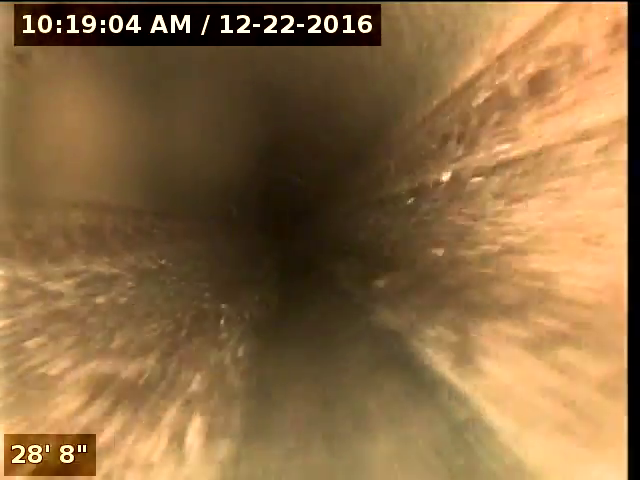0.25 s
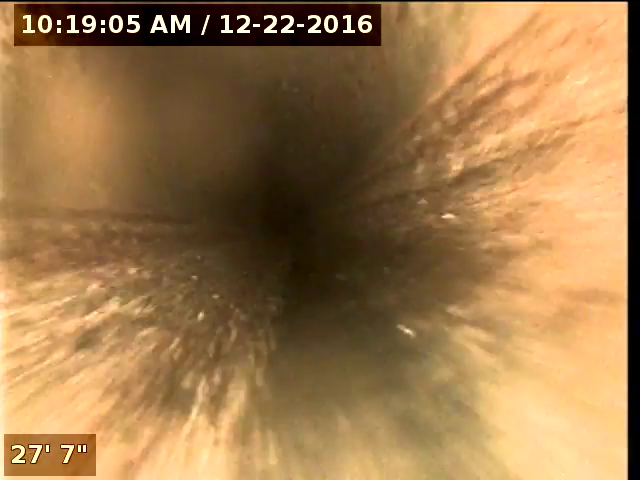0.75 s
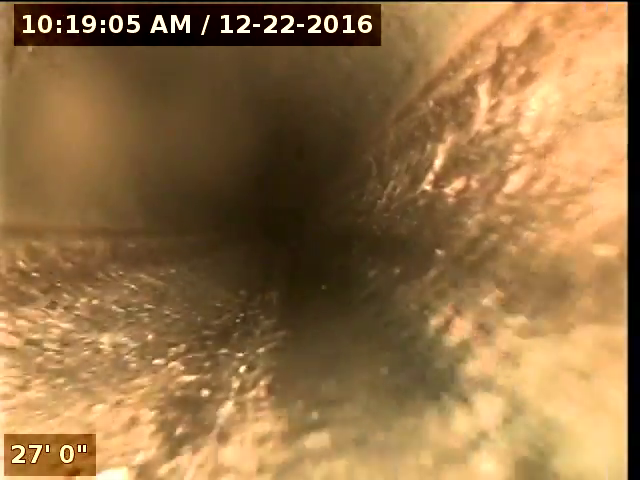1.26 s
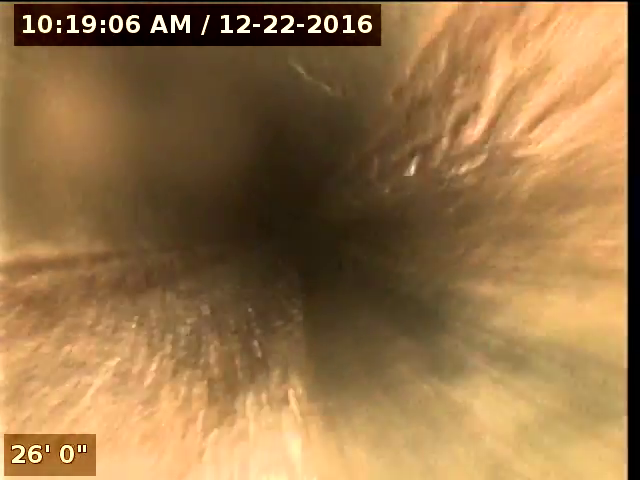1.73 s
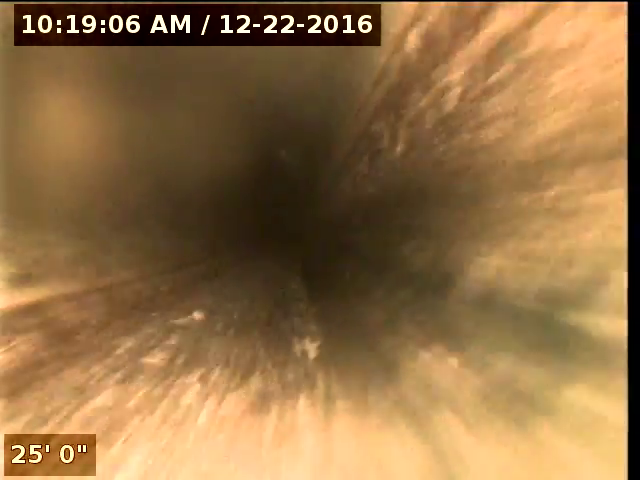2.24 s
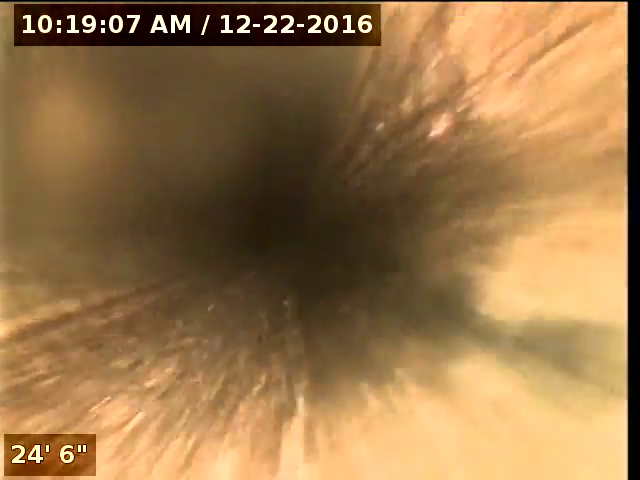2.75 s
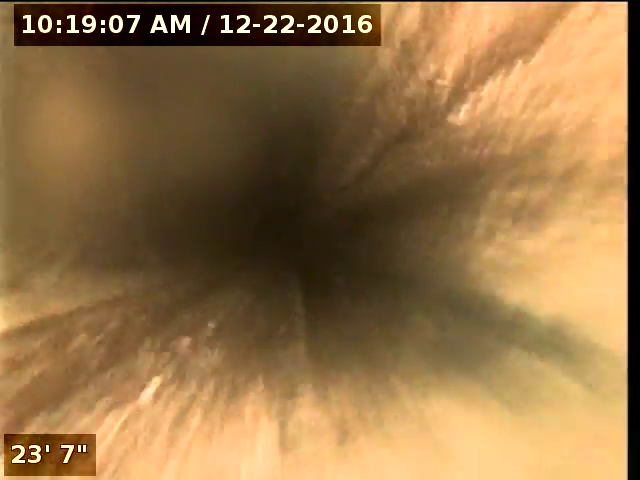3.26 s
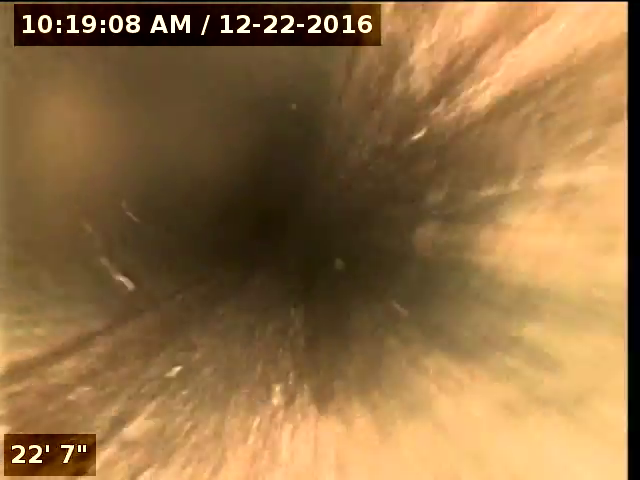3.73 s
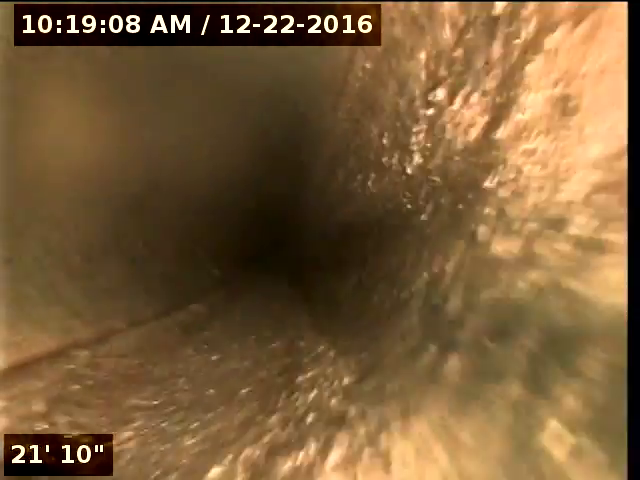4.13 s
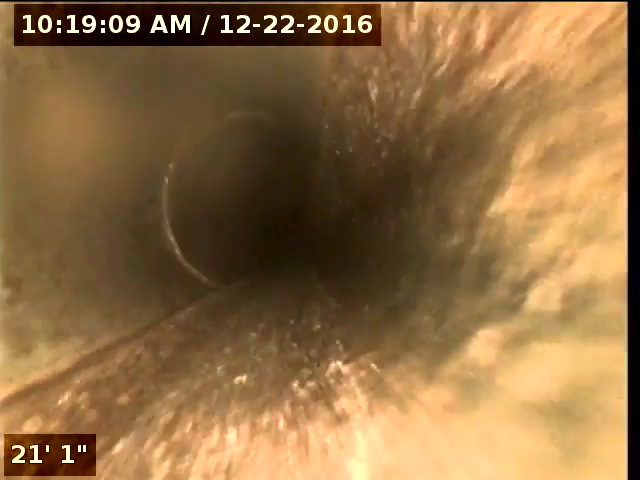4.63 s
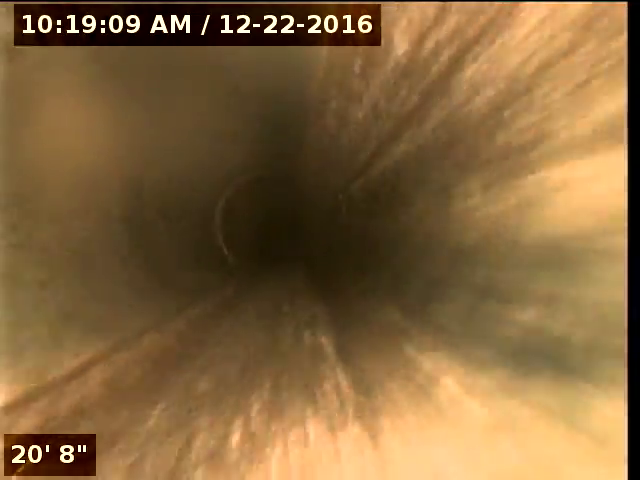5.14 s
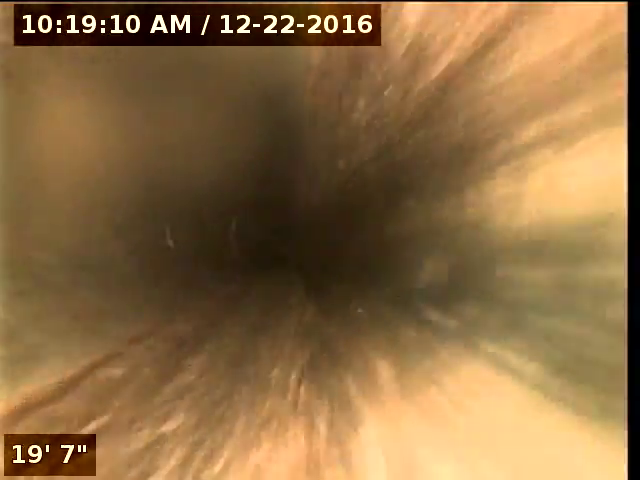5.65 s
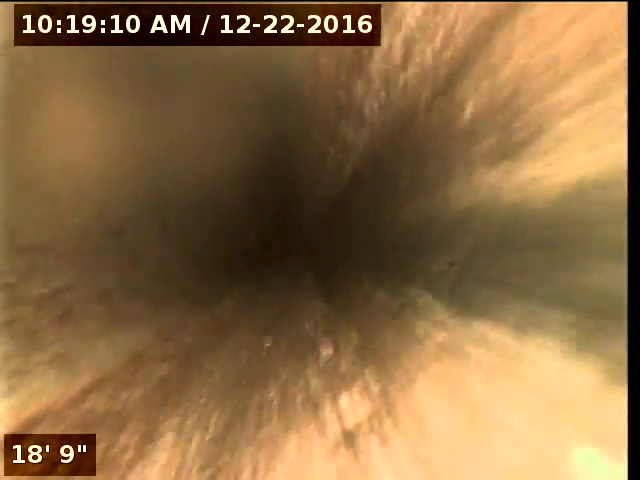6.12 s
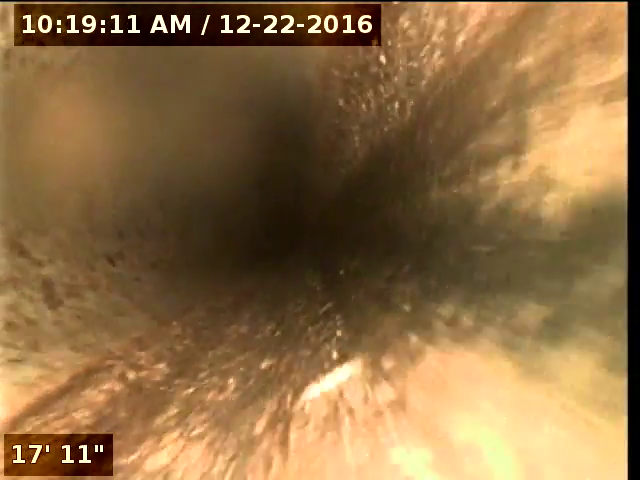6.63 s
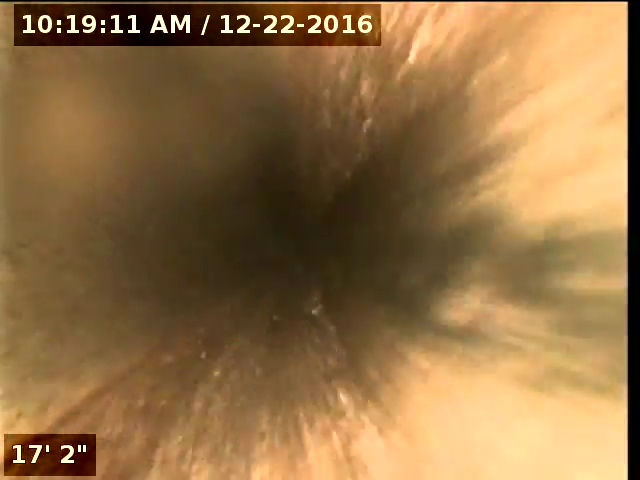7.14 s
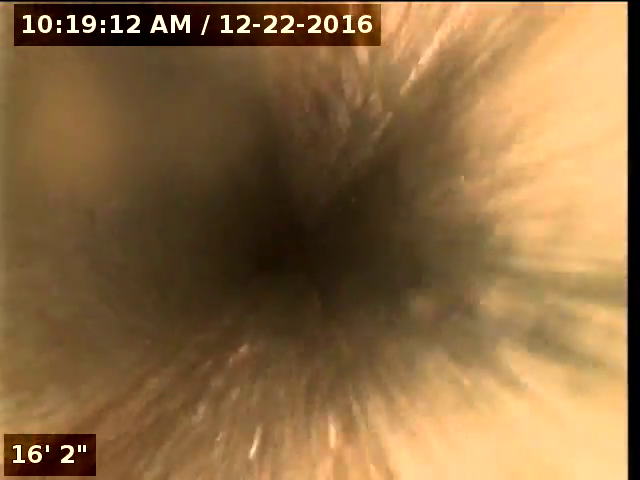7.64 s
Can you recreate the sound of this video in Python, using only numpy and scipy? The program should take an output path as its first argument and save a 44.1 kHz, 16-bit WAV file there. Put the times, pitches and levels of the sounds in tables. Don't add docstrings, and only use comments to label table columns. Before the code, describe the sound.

A camera head scrapes steadily back through a gritty drain pipe, low hollow rumbling and groaning, with scattered hard knocks ringing briefly inside.

```python
import sys
import numpy as np
from scipy import signal
from scipy.fft import rfft, irfft, next_fast_len
from scipy.io import wavfile
from scipy.ndimage import map_coordinates

SR = 44100
rng = np.random.default_rng(int(sys.argv[2]) if len(sys.argv) > 2 else 0)


def ratio(d):
    e = np.asarray(d, float) / 20
    return 10 ** e


def unload_audio(sound):
    columns = np.transpose(np.atleast_2d(sound))
    steps = np.round(np.clip(columns, -1, 1) * 32767)
    wavfile.write(sys.argv[1], SR, steps.astype(np.int16))


N = 347498

# time in seconds, wall pressure in dB, sliding speed in dB.
DRAG = [(0, 6, 1.5), (.5, 2.5, 2.5), (.84, 5, 0), (1.2, 3, 0.5), (1.6, 2.5, 2.5), (1.9, 2.5, 1),
        (2.3, 0, 1), (2.64, 1.5, 1.5), (3.0, 0.5, -0.5), (3.15, 4, 0), (3.6, -2.5, 0.5), (3.96, -1, 0),
        (4.5, -3.5, -2), (5.1, -3, -2), (5.5, -2, -1), (6.0, -3, 1.5), (6.5, -1.5, 1.5), (7.2, 0, 2.5)]
# centre in seconds, half length in seconds, level in dB,
# lean to the upper boom mode (fraction).
GROANS = [(.1, .1, -1.5, .5), (.38, .14, 4, -.2), (.84, 0.082, 1.5, 0.22), (1.12, 0.13, 4, 0.24),
          (1.44, 0.11, 3.5, -0.031), (2.08, 0.13, 5.5, -0.11), (2.52, 0.056, 5, .35),
          (3.2, 0.13, 2.5, -0.093), (3.48, .08, 4.5, -0.19), (3.96, .1, 6.5, 0.26), (4.34, 0.15, 7, .25),
          (4.56, .08, 5.5, -0.15), (4.8, 0.056, 8, 0.021), (5.58, 0.11, 6, -.15), (6.09, 0.14, 10.5, .35),
          (6.6, 0.12, 3, 0.1), (7.06, 0.048, 4.5, -.2), (7.645, .09, 9.5, -0.71)]
# centre in seconds, half length in seconds, level in dB.
SWISHES = [(.5, .1, 1.5), (1.68, 0.06, 2), (2.38, 0.07, 2.5), (2.865, 0.024, 4), (4.5, 0.12, 2.5),
           (5.17, .1, 4.5), (5.78, 0.19, 1.5), (6.24, 0.073, 2.5), (6.84, 0.054, 0), (7.32, 0.068, 3.5)]

# start in seconds, ring in dB, part struck (0 deep to 3 high), crack in dB, fizz in dB.
KNOCKS = [(0.157, -23, .9, -42, -64.5), (0.172, -24.5, 1.5, -58, -81.5), (0.793, -28, 1.1, -46, -65),
          (0.861, -28.5, 1.4, -44.5, -70), (1.0681, -17, 2.3, -21, -43), (1.0735, -13, 1.4, -24.5, -53),
          (2.4128, -13.5, 1.4, -32, -46), (2.433, -25.5, 2.6, -54, -66), (2.447, -26.5, 1.4, -51, -72),
          (2.914, -35.5, 1.4, -41, -62.5), (2.922, -32, 1.4, -48, -64), (3.639, -26, 1.45, -48, -83),
          (3.849, -13, 1.3, -25, -48), (3.855, -18.5, 1.6, -25.5, -56), (4.2145, -22.5, 1.45, -31.5, -51.5),
          (5.271, -21.5, 1.4, -36.5, -54), (5.399, -24.5, 1.3, -37, -49), (5.904, -36.5, 1.2, -35.5, -54.5),
          (5.93, -32, 1.3, -54, -66.5), (7.011, -10, .75, -21.5, -32), (7.07, -22.5, 0.18, -47, -59),
          (7.572, -35, 0.73, -42.5, -68), (7.583, -22, 1.1, -37.5, -60)]
# start in seconds, ring in dB, part struck (0 deep to 3 high).
BUMPS = [(0.027, -34.5, 2.5), (0.323, -25.5, 0.31), (0.385, -30.5, .1), (0.603, -31, 0.27), (1.02, -32, 3),
         (1.513, -30.5, 1.3), (1.771, -29.5, 1.4), (2.335, -30.5, 1.7), (3.054, -36, 1.9),
         (3.088, -31.5, 1.3), (3.778, -29.5, .5), (3.951, -29, 1.4), (4.107, -36.5, 1.8),
         (4.196, -32.5, .1), (4.675, -30.5, 1.76), (4.736, -35, 1.3), (5.027, -40, 3), (5.248, -31, .4),
         (5.346, -29, 0.33), (5.358, -27, .8), (5.62, -34, 1.5), (5.743, -38, 1.6), (6.126, -30.5, 2),
         (6.786, -32.5, 1.2), (7.654, -27, 0.054)]
# start in seconds, crack in dB, fizz in dB.
TICKS = [(0.27, -55, -64), (0.479, -59, -62), (0.816, -48.5, -60.5), (1.296, -48, -56.5), (1.834, -50, -88),
         (1.87, -47.5, -77), (2.371, -57, -65), (2.383, -50, -58), (3.28, -45.5, -64), (4.443, -45.5, -51),
         (5.084, -48.5, -65), (5.46, -49, -60.5), (5.993, -42.5, -63.5), (6.794, -40, -66),
         (6.812, -50, -62.5), (7.696, -43, -57.5), (7.714, -48.5, -63)]

# centre in Hz, width in Hz, gain in dB.
BOOM_MODES = [(231.9, 19.2, 0.0057), (264.6, 35, 0.0032)]
# centre in Hz, width in Hz, gain in dB.
BODY_MODES = [(309.3, 41, -0.5), (445, 41.4, 2), (564, 115, -1), (714, 63, 2), (821, 121, -3.5),
              (1157, 410, -12.5), (1510, 300, -21)]
# level in dB, T60 in seconds.
ECHO = [(-13, 0.26), (-11.5, 0.25), (-9, .22), (-9, 0.16), (-10.5, 0.18)]

# frequency in Hz, density in dB per Hz.
RUMBLE_SPECTRUM = [(15, -60), (25, -28), (70, -7.5), (177, -6.5), (200, -11), (260, -32), (440, -120)]
# frequency in Hz, density in dB per Hz.
HISS_SPECTRUM = [(2590, -31), (4400, -7.5), (5090, -2), (6790, -1), (7770, -7.5), (8160, -14.5),
                 (10600, -38.5), (18000, -120)]
# frequency in Hz, density in dB per Hz.
RASP_SPECTRUM = [(530, -36.5), (900, 1.5), (1170, -2), (1300, -7), (1480, -6.5), (3100, -28.5),
                 (3700, -42.5), (4810, -66.5), (8140, -120)]
# frequency in Hz, density in dB per Hz.
CRACK_SPECTRUM = [(700, -33.5), (1100, 6), (1500, 1.5), (2300, -5), (3200, -12), (4000, -33), (5000, -45.5),
                  (9000, -120)]

# time in seconds, peak in dB.
SPLICES = [
    (2.8208, -37.5),
    (2.8875, -32),
    (6.847, -39),
]
# start in seconds, end in seconds.
LOST_BUFFER = (2.6935, 2.8205)

BOOM_DB, BODY_DB, RASP_DB, HISS_DB, RUMBLE_DB = -37.5, -34.5, -40.5, -68, -48
BOOM_PER_PRESS, RASP_PER_PRESS, RUMBLE_PER_PRESS = 0.6, 0.15, 0.53
HISS_PER_SPEED, RUMBLE_PER_BOOM = 0.2, 0.2
BUMP_CRACK_DB, BUMP_FIZZ_DB = -23.5, -45
TICK_RING_DB, TICK_PART = 2.5, 1.4
FALL_DB, FALL_SOFT = 4, 0.29
CRACK_RISE_S = 0.0011
DRY_DB = 2.5


def unit(x):
    return x / np.sqrt(np.mean(x ** 2) + 1e-20)


def along(points, hz):
    f, v = np.transpose(points)
    return np.interp(np.log(hz + 1), np.log(f + 1), v)


def curves(rows):
    s, *cols = np.transpose(rows)
    return [np.interp(np.arange(N) / SR, s, c) for c in cols]


def swells(rows, column=2):
    t = np.arange(N) / SR
    return sum(row[column] * np.exp(-((t - row[0]) / row[1]) ** 2) for row in rows)


def wobble(knots_per_s):
    return map_coordinates(rng.standard_normal(N // 100), [np.arange(N) * knots_per_s / SR])


def filtered(x, response):
    m = next_fast_len(len(x) + 8192)
    return irfft(rfft(x, m) * response(np.fft.rfftfreq(m, 1 / SR)), m)[:len(x)]


def modes(table):
    def response(f):
        total = 0
        for k, (centre, width, db) in enumerate(table):
            resonance = 1j * f * width / (centre * centre - f * f + 1j * f * width)
            total = total + (-1) ** k * ratio(db) * resonance
        return total / (1 + 1j * f / 1500) ** 2
    return response


def colour(spectrum):
    return lambda f: ratio(along(spectrum, f))


def grit(grains_per_s, spread_db, share):
    hit = rng.random(N) < grains_per_s / SR
    size = ratio(spread_db * np.minimum(rng.exponential(size=N), 3))
    grains = unit(hit * rng.standard_normal(N) * size)
    return np.sqrt(share) * grains + np.sqrt(1 - share) * rng.standard_normal(N)


def rumble(press_db, boom_db):
    level_db = RUMBLE_DB + RUMBLE_PER_BOOM * boom_db + RUMBLE_PER_PRESS * press_db
    return ratio(level_db) * unit(filtered(rng.standard_normal(N), colour(RUMBLE_SPECTRUM)))


def contacts():
    rows = list(KNOCKS)
    rows += [(s, db, part, db + BUMP_CRACK_DB, db + BUMP_FIZZ_DB) for s, db, part in BUMPS]
    rows += [(s, crack + TICK_RING_DB, TICK_PART, crack, fizz) for s, crack, fizz in TICKS]
    out = []
    for s, db, part, crack, fizz in rows:
        fall_db = FALL_DB - FALL_SOFT * (db + 8)
        rings_db = db - fall_db * (np.arange(3) - part) ** 2
        out.append((s, *rings_db, crack, fizz))
    return out


def strike(levels_db, count):
    t = np.arange(count) / SR
    span_s = 0.006 * ratio(0.087 * (max(levels_db) + 16))
    rattle = (t < span_s) * (0.47 + t / span_s)
    sharp = ratio(-60 * t / 0.012) + 0.5 * np.clip(1.3 - t / span_s, 0, 1)
    echo = [ratio(db - 60 * t / t60_s) for db, t60_s in ECHO]
    noise = rng.standard_normal((5, count))

    thud = [(hz, 2.38 * width, db) for hz, width, db in BOOM_MODES]
    parts = (thud + BODY_MODES[:1], BODY_MODES[1:3], BODY_MODES[3:])
    rings = []
    for k, part in enumerate(parts):
        blunt = lambda f: modes(part)(f) / (1 + 1j * f / 1400) ** 2
        rings.append(filtered((rattle + echo[k]) * noise[k], blunt))

    hardness = np.clip(0.43 * (levels_db[3] - max(levels_db[:3]) + 1.5), 0, 3)
    crack = lambda f: colour(CRACK_SPECTRUM)(f) * ((f + 1) / 1500) ** hardness
    rise = 1 - np.exp(-t / CRACK_RISE_S)
    for k, response in ((3, crack), (4, colour(HISS_SPECTRUM))):
        envelope = rise * (sharp + ratio(-DRY_DB * hardness) * echo[k])
        rings.append(envelope * filtered(noise[k], response))

    head = SR // 70
    return sum(ratio(db) * r / np.std(r[:head]) for db, r in zip(levels_db, rings))


def knocks():
    count = SR // 4
    out = np.zeros(N + count)
    for s, *levels_db in contacts():
        out[round(s * SR):][:count] += strike(levels_db, count)
    return out[:N]


def hiss(speed_db, jerk):
    level_db = HISS_DB + HISS_PER_SPEED * speed_db + swells(SWISHES) + 0.9 * jerk + 0.73 * wobble(25)
    grains = grit(grains_per_s=1200, spread_db=2, share=0.2)
    return ratio(level_db) * unit(filtered(grains, colour(HISS_SPECTRUM)))


def rasp(stones, press_db, speed_db, jerk):
    level_db = RASP_DB + speed_db + RASP_PER_PRESS * press_db + 0.9 * jerk + 0.65 * wobble(7.6)
    friction = stones + 1.07 * rng.standard_normal(N)
    return ratio(level_db) * unit(filtered(friction, colour(RASP_SPECTRUM)))


def body(stones, press_db, jerk):
    level_db = BODY_DB + press_db + 1.9 * jerk + wobble(9)
    return ratio(level_db) * unit(filtered(stones, modes(BODY_MODES)))


def boom(stones, boom_db, jerk):
    lower, upper = [unit(filtered(stones, lambda f: modes([m])(f) ** 1.464)) for m in BOOM_MODES]
    share = np.clip(0.56 + swells(GROANS, column=-1) + 0.12 * wobble(7), 0, 1)
    lean = np.pi / 2 * share
    return ratio(BOOM_DB + boom_db + 0.38 * jerk) * (np.cos(lean) * lower + np.sin(lean) * upper)


def scrape():
    press_db, speed_db = curves(DRAG)
    boom_db = BOOM_PER_PRESS * press_db + swells(GROANS) + 1.5 * wobble(6)
    jerk = wobble(14)
    stones = grit(grains_per_s=800, spread_db=0.5, share=0.32)
    out = rumble(press_db, boom_db) + hiss(speed_db, jerk)
    out += rasp(stones, press_db, speed_db, jerk)
    return out + body(stones, press_db, jerk) + boom(stones, boom_db, jerk)


def scene():
    return (knocks() + scrape())[None]


def band_limit(x):
    return signal.sosfilt(signal.butter(12, 8310, fs=SR, output="sos"), x)


def record(dry):
    x = dry + 0.5 * dry ** 2
    x = x / (1 + np.abs(x / 0.88) ** 5) ** (1 / 5)
    notch = lambda f: np.tanh(np.abs(f - 4040) / 250) ** 1.1 * f / (f + 8)
    x = filtered(x[0], notch)
    t = np.arange(N) / SR
    for s, db in SPLICES:
        x = x + ratio(db + 9.5) * (t >= s) * np.exp(-np.abs(t - s) / 0.00014)
    present = (t < LOST_BUFFER[0]) | (t > LOST_BUFFER[1])
    x = filtered(x * present, lambda f: 1 / (1 + (f / 8200) ** 40))
    return band_limit(np.clip(x[None], -1, 1))


dry = scene()
out = record(dry)
unload_audio(out)
```